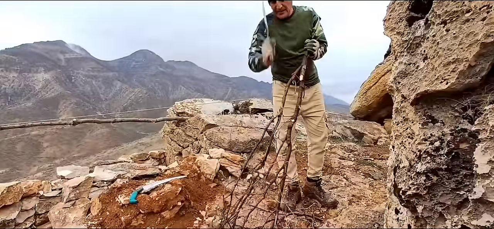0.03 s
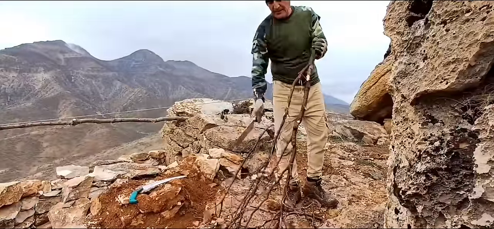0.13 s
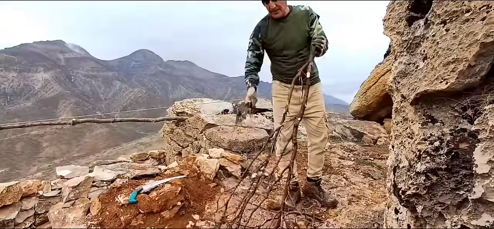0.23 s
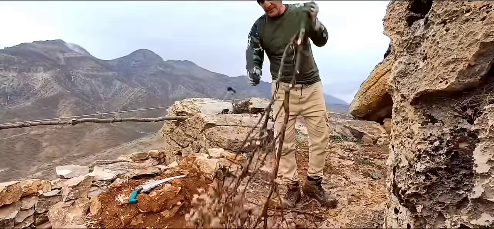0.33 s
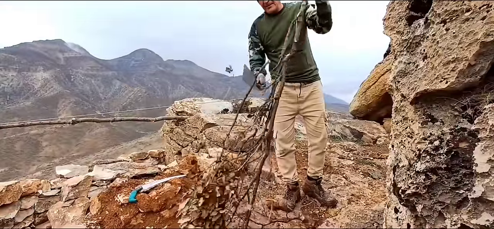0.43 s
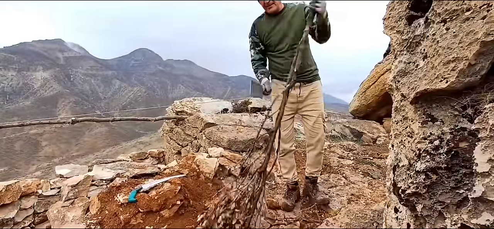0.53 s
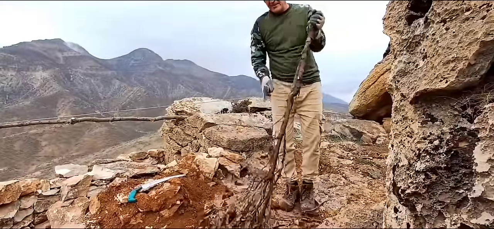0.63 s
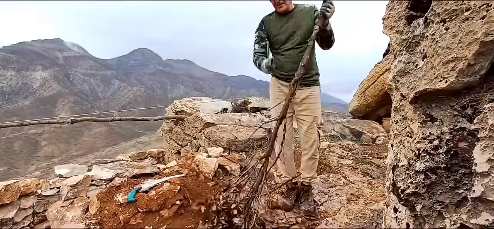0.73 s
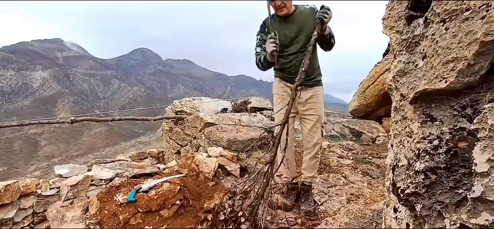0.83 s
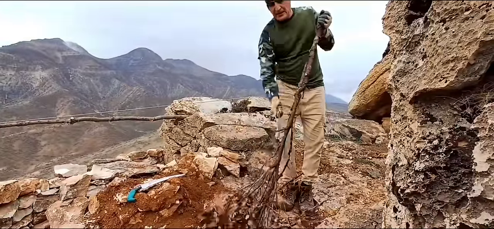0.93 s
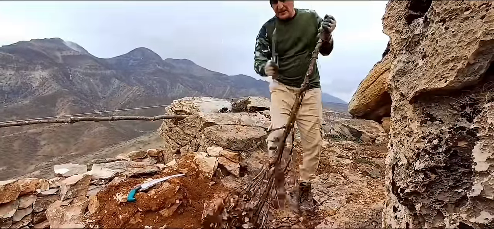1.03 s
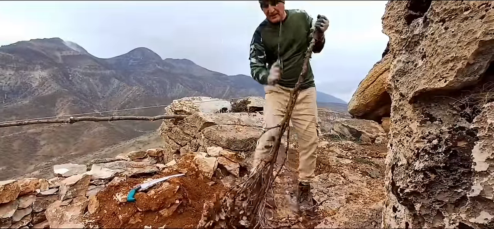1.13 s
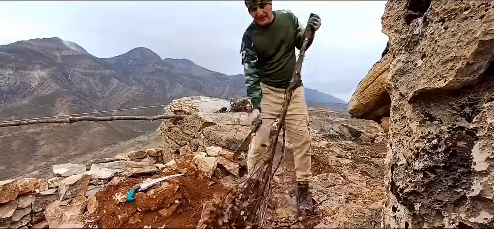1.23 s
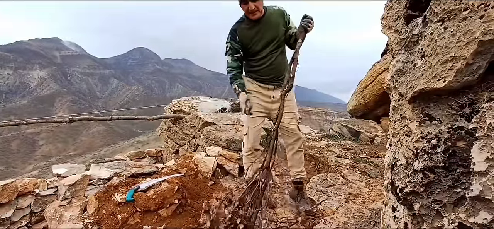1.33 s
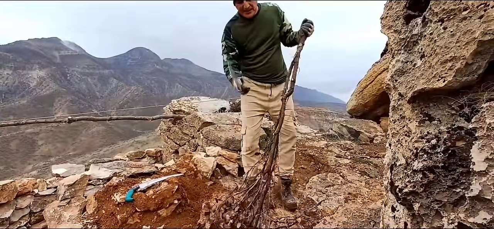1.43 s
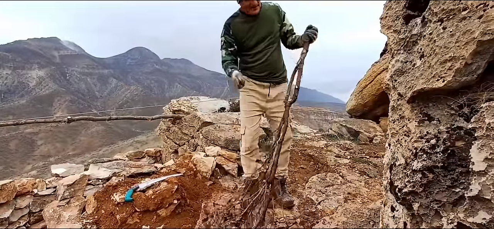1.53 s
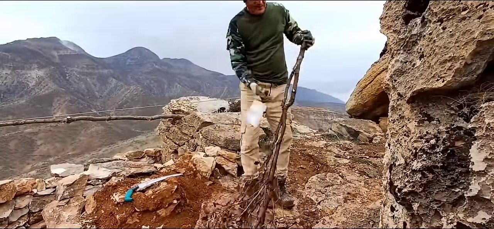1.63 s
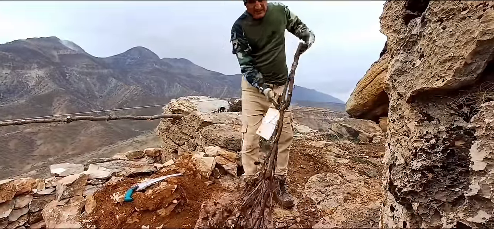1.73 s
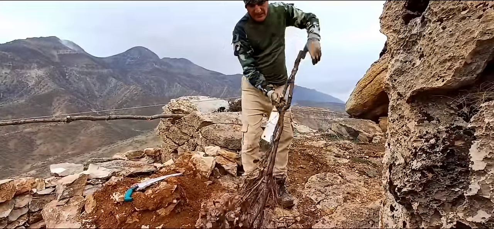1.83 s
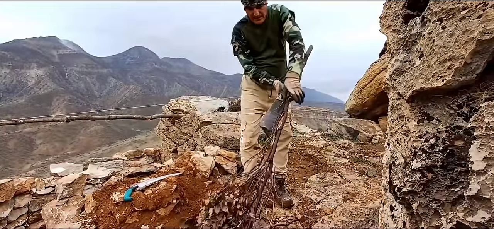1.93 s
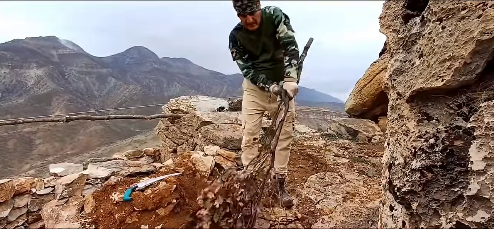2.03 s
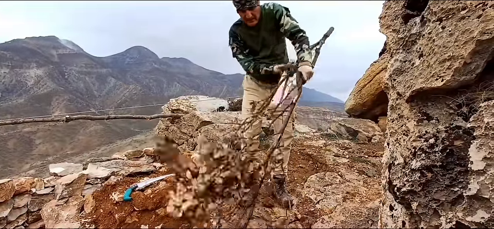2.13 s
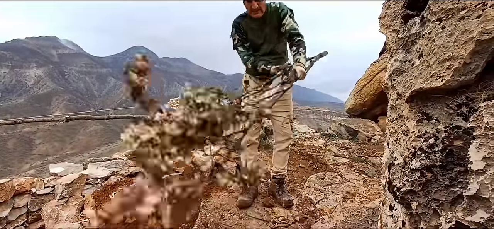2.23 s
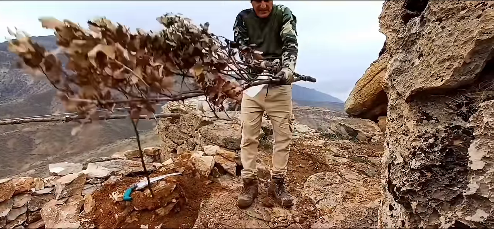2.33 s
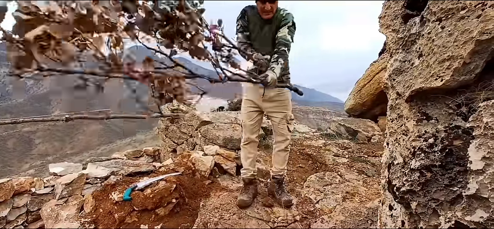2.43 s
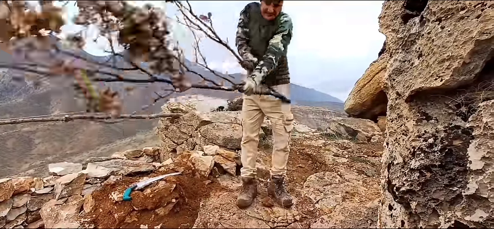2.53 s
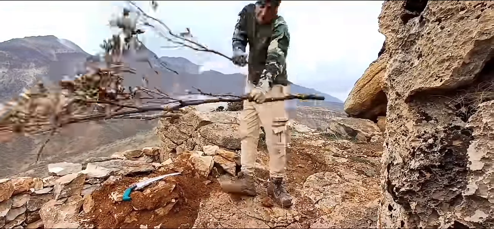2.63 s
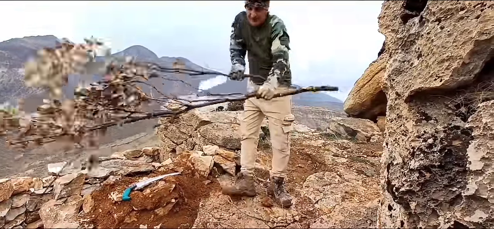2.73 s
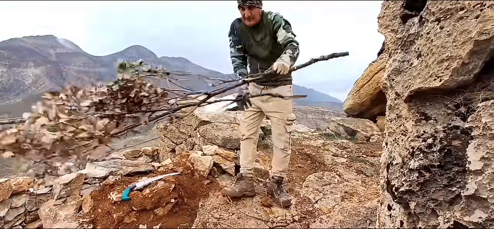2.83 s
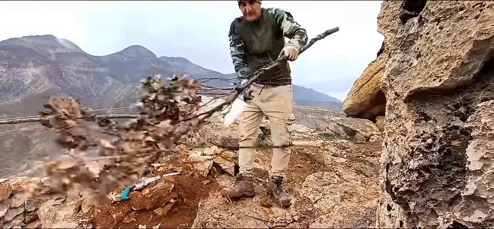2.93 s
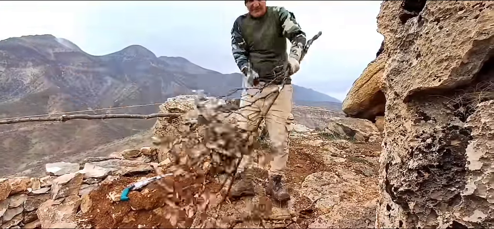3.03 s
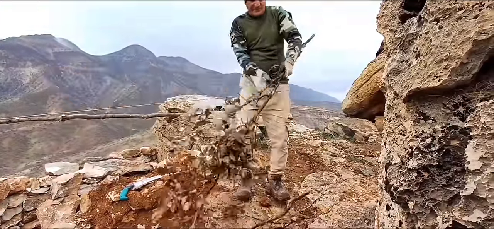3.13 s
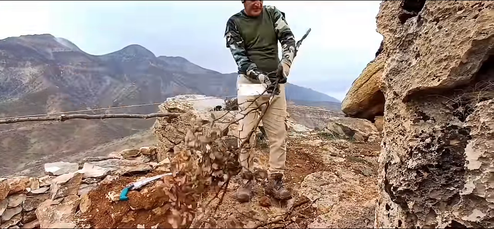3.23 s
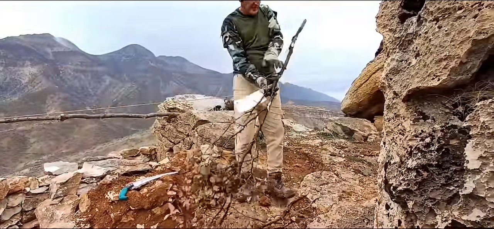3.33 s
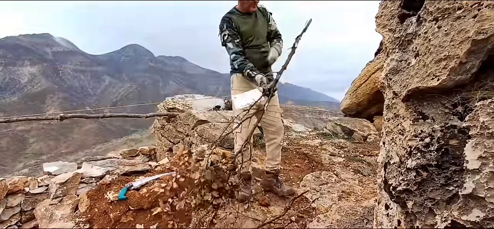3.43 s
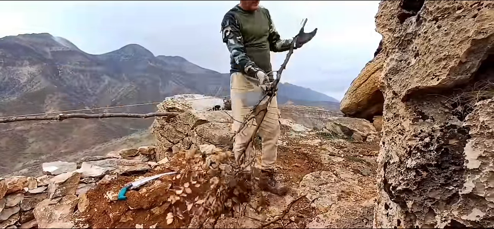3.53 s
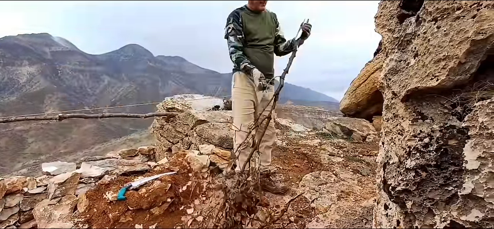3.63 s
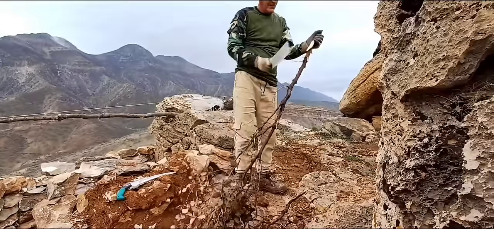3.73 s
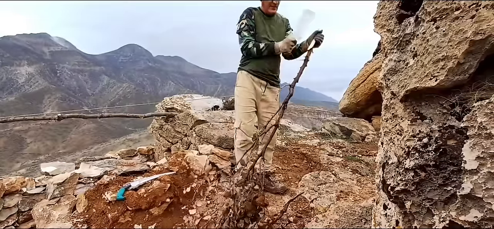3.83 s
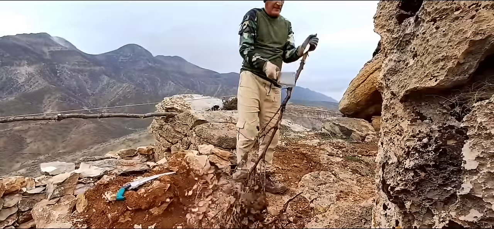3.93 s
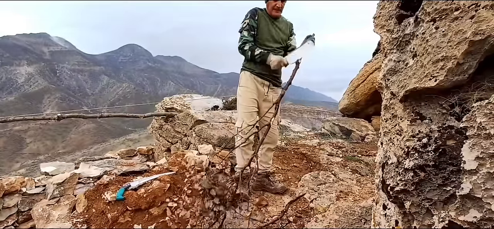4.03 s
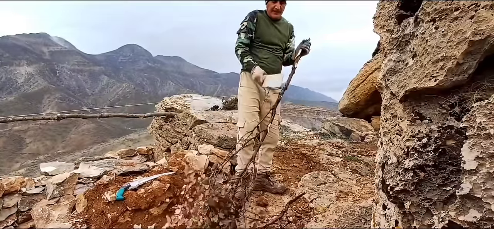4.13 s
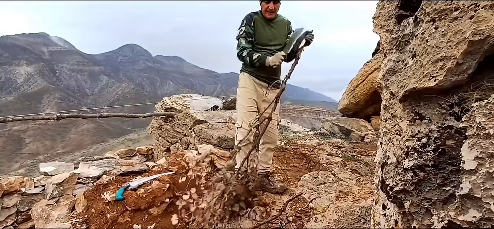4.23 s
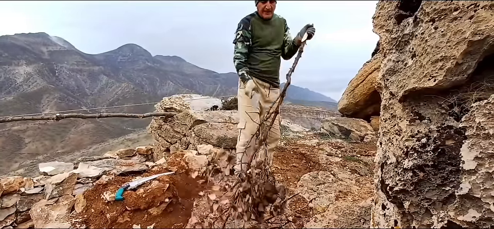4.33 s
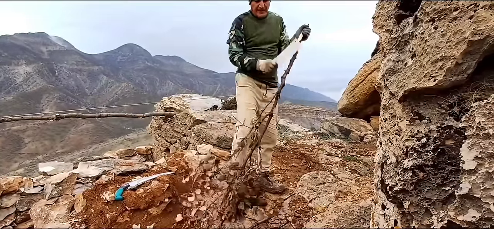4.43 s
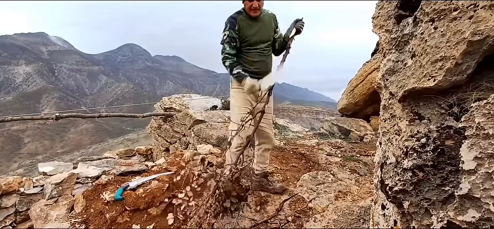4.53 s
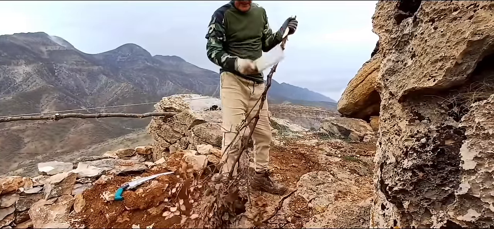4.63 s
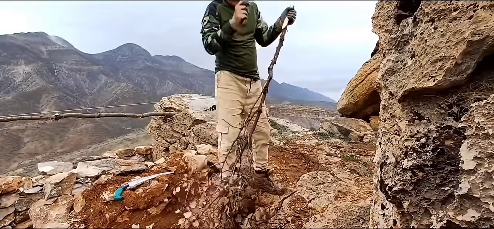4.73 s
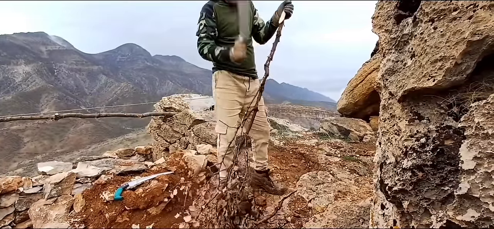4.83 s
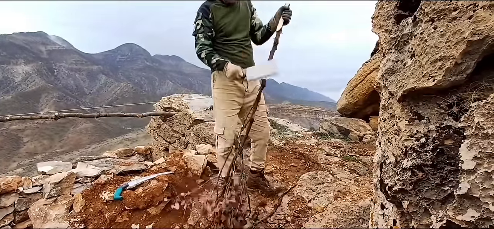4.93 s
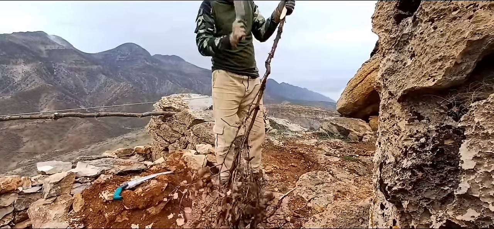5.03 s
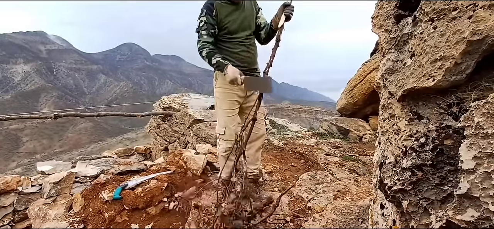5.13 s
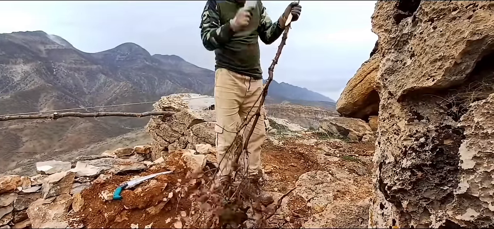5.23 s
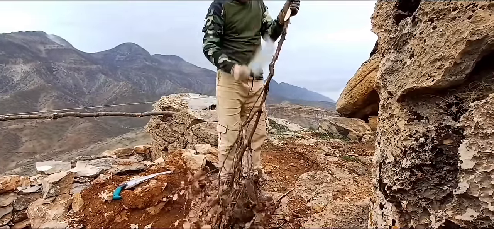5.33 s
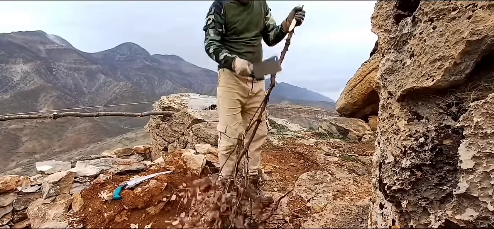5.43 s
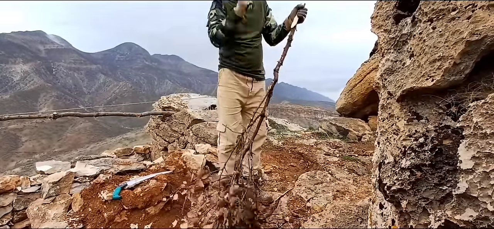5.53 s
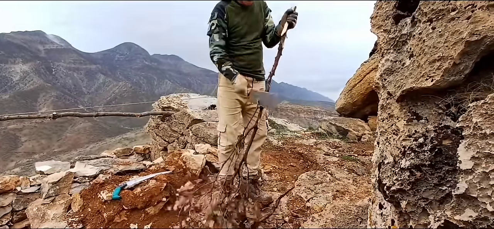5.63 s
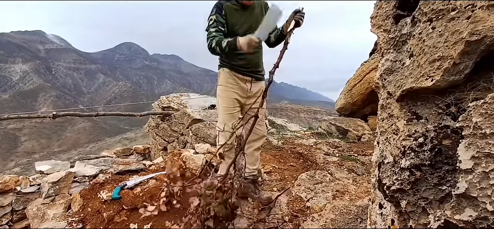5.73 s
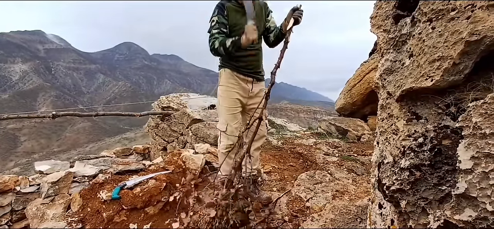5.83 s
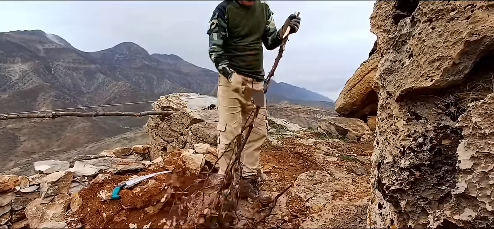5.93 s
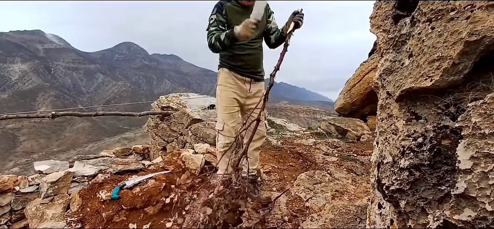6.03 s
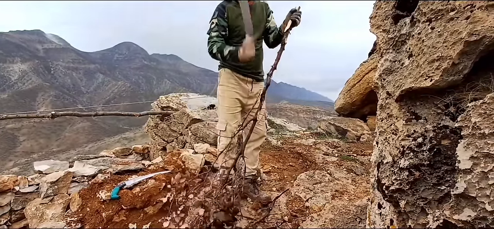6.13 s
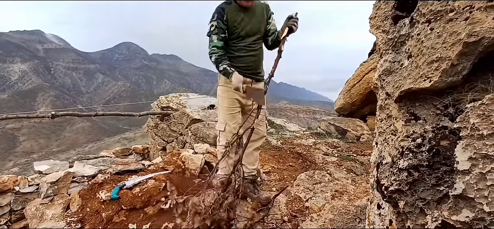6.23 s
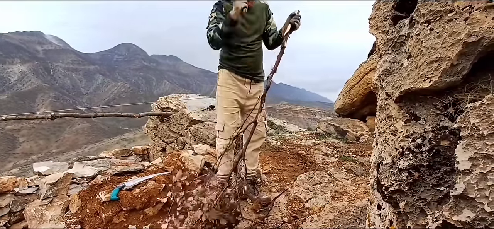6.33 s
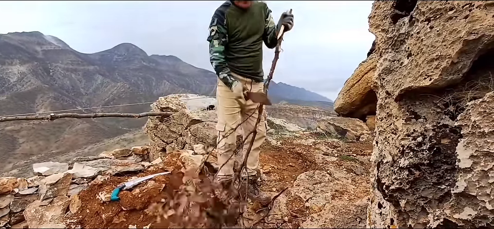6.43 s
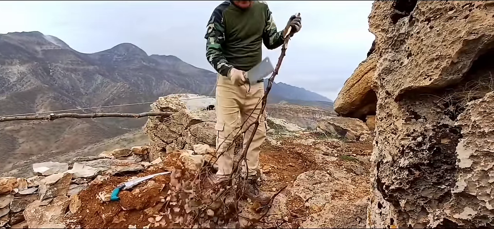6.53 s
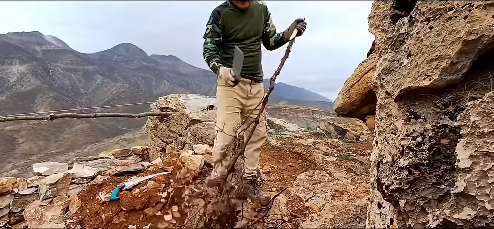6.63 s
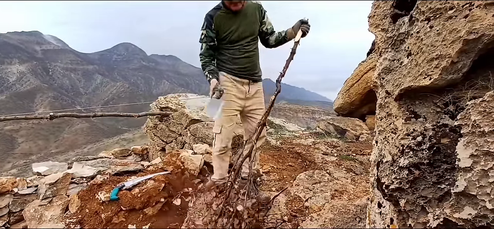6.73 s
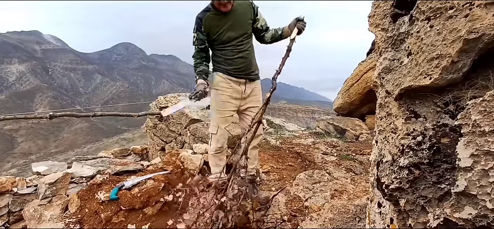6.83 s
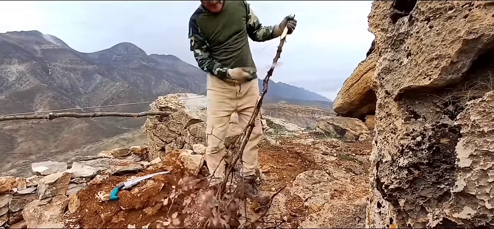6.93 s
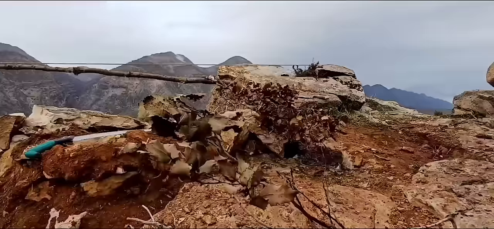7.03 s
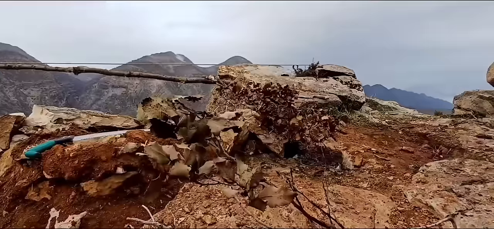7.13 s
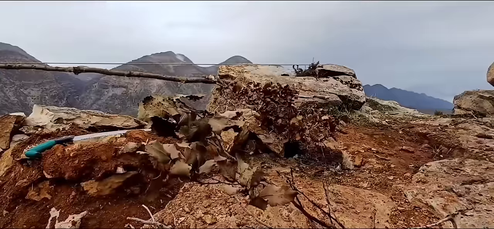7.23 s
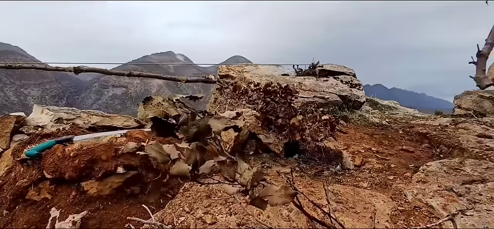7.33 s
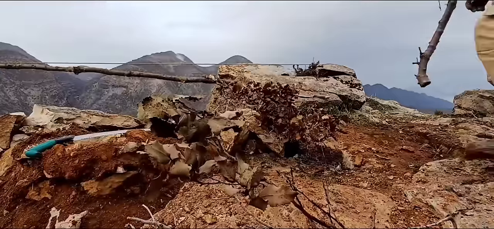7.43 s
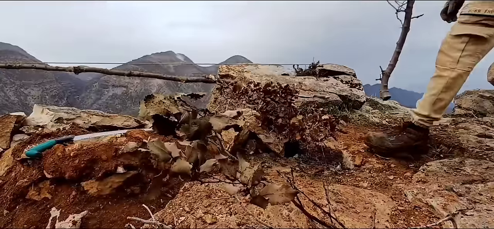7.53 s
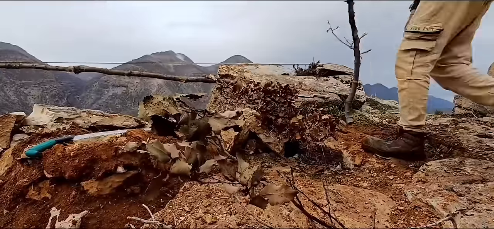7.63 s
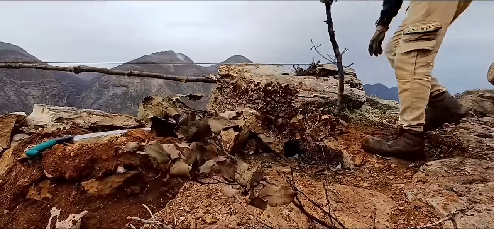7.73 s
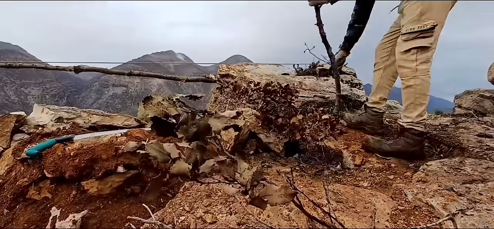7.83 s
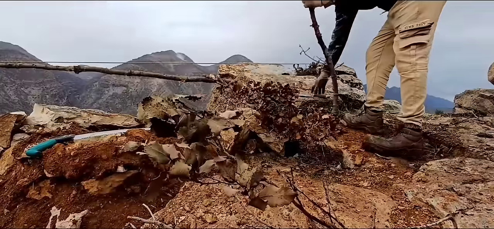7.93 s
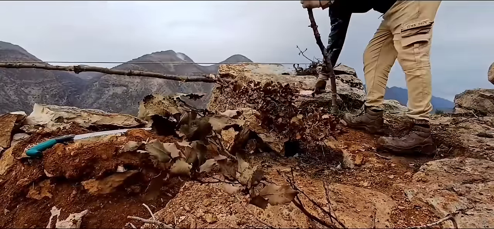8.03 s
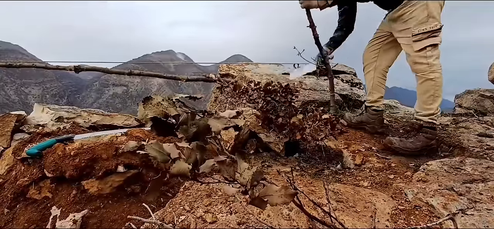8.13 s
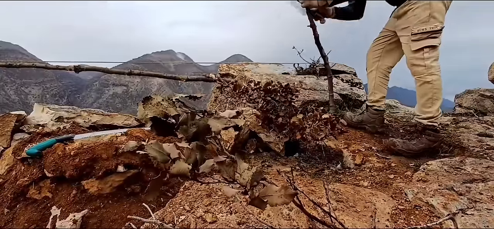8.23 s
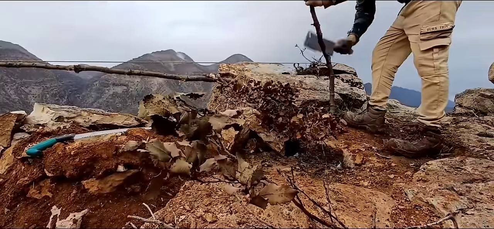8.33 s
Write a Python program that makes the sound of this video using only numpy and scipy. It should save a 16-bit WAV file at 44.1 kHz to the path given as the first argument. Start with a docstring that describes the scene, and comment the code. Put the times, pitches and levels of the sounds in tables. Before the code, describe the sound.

Close stereo outdoor sound, dry with only slight rock reflections: hard, crackling blade hits on brittle wood, dead leaves shivering after each. Between early hits the leafy crown swishes and twigs flick; later chops fall about four per second apart from small gaps. Sound cuts out momentarily, then it is quieter, with gritty boot scuffs, dull bumps and low wind puffs.

```python
"""Open hillside above a valley: a dry, leafy branch is trimmed with a cleaver a few steps from the microphone.
Chop = filtered crackle (knock, fibre tear, fizz) + blade and stem modes + chatter of dead leaves.
Between chops: enveloped crackle for swung leaves and twig flicks; later, boots scrape over grit.
Dull, unsteady sine thuds for footfalls, bumps and gust pops at the microphone.
Background: shaped noise for gusts and valley air, a faint gliding hum. All sound drops out briefly near 7 s."""
import sys
import numpy as np
from scipy import signal
from scipy.fft import rfft, irfft, next_fast_len
from scipy.io import wavfile
from scipy.ndimage import uniform_filter1d

SR = 44100
rng = np.random.default_rng(int(sys.argv[2]) if len(sys.argv) > 2 else 0)


def inscribe(sig):
    """Save sig as 16-bit PCM at rate SR to the path in sys.argv[1].

    A 1-D sig is mono; a 2-D sig holds one channel per row.
    Samples are clipped to [-1, 1] before scaling.
    """
    pcm = np.round(np.clip(np.atleast_2d(sig).T, -1, 1) * 32767)
    wavfile.write(sys.argv[1], SR, pcm.astype(np.int16))


N = 369116
TIME_S = np.arange(N) / SR

# Cleaver blows: t/s, time in wood/s, rel. knock/dB, rel. crack/dB, rel. fizz/dB, strongest ring f/Hz,
# leaf level/dB, leaf 20 dB fall time/s, extra leaf treble/dB
CHOPS = [(0.047, .005, -24.5, -20, -26, 820, -32, .11, 0),
         (0.8535, .01, -33.5, -19.5, -17.5, 2800, -37, .13, -4),
         (1.157, .005, -24.5, -17.5, -16.5, 400, -40, .11, -3),
         (3.828, .004, -38, -33, -35.5, 1850, -39.5, .09, -3),
         (3.872, .003, -35, -31, -32, 400, -45, .08, -3), (4.055, .006, -33, -24, -26, 820, -42, .15, -1),
         (4.257, .01, -46, -33, -33, 2800, -36, .07, 2), (4.4995, .012, -33, -23, -29, 1850, -36, .125, 2),
         (4.822, .006, -24, -25, -22.5, 1490, -33, .135, 3),
         (5.067, .0025, -24.5, -22.5, -25, 1110, -34, .125, 2),
         (5.316, .004, -22, -23, -17, 820, -32.5, .12, 1.5),
         (5.595, .004, -26.5, -22.5, -35, 1850, -34, .125, 1),
         (5.846, .01, -38, -29.5, -27, 2800, -34, .155, 3),
         (6.1225, .006, -30, -24.5, -27, 2150, -32.5, .13, 2.5),
         (6.391, .018, -34.5, -30.5, -30, 1110, -31.5, .125, 3),
         (6.8685, .007, -36, -30, -38, 3970, -39, .11, 1), (8.301, .003, -40, -46, -48, 1110, -44, .2, -5)]
# Strained wood giving way: peak t/s, 60 dB rise time/s, t60/s, rel. knock/dB, rel. crack/dB, rel. fizz/dB,
# strongest ring f/Hz
SPLITS = [(1.176, .06, .075, -41, -27, -25, 12800), (2.5312, .075, .085, -42, -26, -30, 4000),
          (4.04, .025, .035, -42, -29.5, -27.5, 5100), (4.27, .03, .06, -41, -25, -21, 7600),
          (4.3402, .0033, .029, -44, -32, -22.5, 15200), (4.5242, .0105, .0275, -34, -8, -16.5, 7600),
          (8.3318, .018, .055, -39, -26.5, -24, 12400)]
# Modes of the blade in the wood: f/Hz, t60/s, rel. level/dB
BLADE_MODES = [(390, .03, -16), (505, .025, -20), (818, .035, -13), (1110, .035, -12), (1488, .04, -14),
               (1846, .055, -8.5), (2150, .03, -16.5), (2800, .04, -10), (3970, .04, -15),
               (5020, .03, -18.5), (6390, .03, -18), (7550, .028, -19), (12800, .012, -24),
               (14400, .012, -24), (15330, .018, -18)]
# Single twig flicks: t/s, rel. level/dB, treble re body/dB
TWIGS = [(0.5273, -18, 12), (0.578, -20.5, 6), (1.0627, -40, 6), (1.2646, -36, 1), (1.4717, -42, 0),
         (1.5768, -36, 8), (1.6867, -41, -2), (1.7719, -32, 4), (1.8394, -36, -3), (1.9725, -34, -1),
         (2.1203, -28, 0), (2.156, -27, 8), (2.2563, -36, -8), (2.364, -29, 5), (2.4888, -28, 4),
         (2.7167, -24.5, 5), (2.829, -26, -15), (2.9872, -26, -2), (3.0615, -23.5, -1), (3.1203, -32, 8)]
# Blade brushing a twig, ringing freely: t/s, f/Hz, level/dB, t60/s
PINGS = [(2.830, 1854, -33, .088), (2.830, 3892, -44, .053)]
# Sweeps of the leafy crown: peak t/s, rel. level/dB, 20 dB swell time/s, 20 dB fade time/s
SWISHES = [(0.32, -49, .06, .17), (0.59, -44, .2, .18), (1.09, -59, .05, .07), (1.26, -56, .06, .09),
           (1.54, -59, .15, .08), (1.79, -54, .03, .14), (2.115, -46, .2, .17), (2.385, -45.5, .08, .16),
           (2.535, -41, .05, .18), (3.0, -42, .085, .17), (3.18, -54.5, .1, .28), (3.66, -63, .2, .1),
           (4.41, -60, .14, .1), (6.58, -60, .1, .18), (4.04, -44, .03, .03), (5.589, -38, .02, .025)]
# Low thuds: footfalls, bumps and gust pops at the microphone:
# t/s, mean f/Hz, level/dB, t60/s, lean/dB (added left, taken off right)
THUDS = [(2.385, 137, -47.5, 0.33, 0.5), (2.454, 122, -44, 0.33, 0), (3.328, 88, -28, 0.13, 9),
         (3.424, 95, -41.5, 0.11, 10), (7.162, 589, -39.5, 0.074, -2), (7.186, 675, -41, 0.057, -1),
         (7.199, 129, -34.5, 0.039, -1), (7.323, 68.6, -44, .07, 5), (7.632, 500, -54.5, .05, 0.5),
         (7.851, 70, -39.5, .12, 6)]
# Boots on dry dirt: peak t/s, rel. level/dB, 60 dB swell time/s, t60/s
SCUFFS = [(7.203, -43, 0.17, 0.085), (7.28, -71, .2, .4), (7.49, -71.5, .25, .5), (7.595, -57.5, .16, .11),
          (7.79, -75, .2, .4), (8.048, -59, .16, .079)]
# Gusts at the microphone: t/s, level/dB, half length/s, lean/dB (added left, taken off right)
BUFFETS = [(0.6, -57, .12, -4), (0.85, -57, .15, 3), (2.5, -53, .1, 1), (2.75, -56, .04, 5),
           (3.38, -50, .1, 10), (4.13, -45, .08, 0), (4.2, -46.5, .05, 6), (4.87, -54, .14, 4),
           (5.09, -49, .06, 6), (5.59, -52, .08, 5), (6.13, -53, .05, 0), (6.43, -53, .05, 0),
           (7.34, -55, .08, 8), (7.52, -56, .07, 8), (7.87, -52, .08, 10), (8.34, -53, .05, 0)]
# Distant valley air: t/s, rel. level/dB
AIR = [(0, -56.5), (3.3, -56.5), (4.3, -54), (5.5, -60), (6.9, -56.5), (7.08, -72), (7.25, -67),
       (8.37, -67)]
# Faint far hum: t/s, f/Hz, level/dB
HUM = [(3.63, 410, -77), (3.68, 401, -54), (3.73, 408, -63), (3.78, 412, -54), (3.83, 400, -73)]

# Spectra of wood, dead leaves, leafy crown, valley air, gusts: f/Hz, rel. density/dB
WOOD = [(60, -26.5), (160, -8), (300, -7), (430, -4), (650, -7), (1050, 0), (1600, -3), (2800, 0),
        (4600, -4), (7500, -5), (8800, -12), (11000, -8), (15500, -2)]
LEAVES = [(59, -31), (100, 0), (358, -5), (705, -5.5), (768, -5.5), (1080, -3), (1230, -6.5), (1610, -7),
          (2170, 0.5), (2420, -2.5), (3540, -5), (7450, -7), (9410, -11.5), (15000, 0.5), (16000, -5.5)]
CROWN = [(120, -35), (200, -4.5), (387, -5), (456, -2), (590, -6), (899, -1), (1350, -4), (1480, -7.5),
         (2250, 0), (5230, -6), (7410, -5.5), (8900, -12.5), (15100, -1), (16000, -4)]
VALLEY = [(30, -14), (100, -3), (250, -4), (420, -2), (600, -4.5), (820, 1.5), (1050, -2), (1300, 0.5),
          (1600, -7), (2200, -20), (5000, -30.5), (10000, -32), (15500, -27.5)]
GUSTS = [(20, -12), (50, -2), (80, 0), (125, -4), (190, -15.5), (350, -32.5), (1000, -59.5)]
# Spectrum of grit under boots: f/Hz, rel. density/dB
GRIT = [(100, -7), (600, 0.5), (1500, -6), (4000, -10), (7500, -10), (9500, -15), (15000, -10)]
# Left-right likeness of near cracks and of spread sounds: f/Hz, coherence/0-1
NEAR_SAME = [(100, 1), (600, .9), (1300, .5), (4000, 0.4), (8000, .1), (16000, .05)]
WIDE_SAME = [(100, 1), (500, .8), (1200, .35), (2200, 0.07), (16000, .02)]
# Left-right likeness of valley air and of gusts: f/Hz, coherence/0-1
AIR_SAME = [(100, .85), (800, .7), (1500, .4), (4000, .1)]
GUST_SAME = [(40, .15), (150, .6)]
# Port tilt: f/Hz, gain/dB (added left, taken off right)
PORT_LEAN = [(150, 0), (600, -1.66), (1500, -2.1), (3000, -0.54), (8000, 0), (13000, 2.5)]

CHOP_RISE_S, CHOP_T60_S = .0045, .031  # edge enters at once; stem stops soon after
SETTLE_DB, SETTLE_DB_PER_S = -14.5, 85  # last leaves come to rest slowly after a blow
FLICK_DB, FLICK_DB_PER_S = -18, 220  # a twig shakes its own few leaves
SWISH_SHAPE = 1.5  # power of time: 1 pointed, 2 round
CARRIED_S = (0.2, 3.38)  # branch on the move, never quite still
DROPOUT_S = (7.0, 7.063)
EDGE_HZ = 16000


def amp(db):
    """Decibels to gain."""
    return np.exp(np.asarray(db) * (np.log(10) / 20))


def unit(x):
    """Scales to rms 1."""
    return x / np.sqrt(np.mean(x ** 2) + 1e-20)


def read(points, hz):
    """Interpolates a frequency table on a log-frequency axis."""
    f, value = np.transpose(points)
    return np.interp(np.log(hz + 1), np.log(f + 1), value)


def curve(rows, axis=1):
    """One column of a time table at every sample."""
    rows = np.asarray(rows)
    return np.interp(TIME_S, rows[:, 0], rows[:, axis])


def add(mix, at_s, sound):
    """Adds a sound to the mix, cropped to fit."""
    start = round(at_s * SR)
    sound = sound[:, max(-start, 0):]
    part = mix[:, max(start, 0):][:, :sound.shape[1]]
    part += sound[:, :part.shape[1]]


def colour(x, spectrum, lo_hz=15, hi_hz=21000):
    """Minimum-phase filter: given spectrum between two steep band edges."""
    size = 4096 if x.shape[1] > SR else 1024
    hz = abs(np.fft.fftfreq(size, 1 / SR)) + 1
    edges = np.sqrt((1 + (lo_hz / hz) ** 12) * (1 + (hz / hi_hz) ** 12))
    gain = amp(read(spectrum, hz)) / edges
    response = np.exp(np.conj(signal.hilbert(np.log(gain + 1e-5))))
    taps = np.fft.ifft(response).real[:size // 2]
    return signal.oaconvolve(np.float32(x), np.float32(taps[None]), axes=1)[:, :x.shape[1]]


def pair(x, likeness):
    """Mixes two unrelated signals to a stereo pair of given coherence."""
    size = next_fast_len(x.shape[1])
    a, b = rfft(np.float32(x), size)
    turn = np.arccos(np.clip(read(likeness, np.fft.rfftfreq(size, 1 / SR)), 0, 1)) / 2
    mid, side = a * np.cos(turn), b * np.sin(turn)
    return irfft([mid + side, mid - side], size)[:, :x.shape[1]]


def wander(n, rate_hz):
    """Random knots joined by straight lines, about unit spread."""
    at = np.arange(n) * rate_hz / SR
    knots = rng.standard_normal(n // 128 + 2)
    return np.interp(at, np.arange(len(knots)), knots) * np.sqrt(3 / 2)


def scatter(x, t60_s, likeness):
    """Close reflections: short decaying noise blurs and colours the cracks, differently at each port."""
    t = np.arange(512) / SR
    taps = pair(rng.standard_normal((2, len(t))), likeness) * amp(-60 * t / t60_s)
    taps = unit(taps) / np.sqrt(len(t))
    return signal.oaconvolve(np.float32(x[None]), np.float32(taps), axes=1)[:, :len(x)]


def crackle(n, per_s, spread_db, clump_db, likeness, count=2, t60_s=.008):
    """Clumped tiny fractures of uneven size from several spots, each with its own colour."""
    out = 0
    for _ in range(count):
        at = np.flatnonzero(rng.random(n) < per_s / count / SR)
        size, sign = rng.random((2, n))[:, at]
        knots = rng.standard_normal(n // 360 + 2)  # one per 8 ms
        clumps = np.interp(at / 360, np.arange(len(knots)), knots)
        size_db = spread_db * np.minimum(-np.log(size + 1e-9), 4) + clump_db * clumps
        clicks = np.zeros(n)
        clicks[at] = amp(size_db) * np.sign(sign - .5)
        out = out + scatter(clicks, t60_s, likeness)
    return out


def burst(rise_s, t60_s, hold_s=0):
    """Times round an onset, and an envelope that swells to it, holds and dies away."""
    t = np.arange(-SR // 9, SR // 7) / SR
    steps = np.where(t < 0, -t / rise_s, (t - hold_s) / t60_s)
    return t, amp(np.minimum(-60 * steps, 0))


def blade_ring(tear, ring_hz, focus_octaves):
    """Tearing drives decaying blade and stem modes; where the edge lands decides which ring most."""
    age = np.arange(SR // 20) / SR
    mode_hz, mode_t60_s, mode_db = np.transpose(BLADE_MODES)[:, :, None]
    dying = amp(-60 * age / mode_t60_s) / np.sqrt(mode_t60_s)
    focus = np.exp(-(np.log2(mode_hz / ring_hz) / focus_octaves) ** 2)
    weight = amp(mode_db + rng.normal(0, 3, mode_db.shape)) + focus
    tuned_hz = mode_hz * rng.normal(1, .004, mode_hz.shape)
    modes = (weight * dying * np.cos(2 * np.pi * tuned_hz * age)).sum(0)
    return unit(signal.fftconvolve(tear, modes[None], axes=1)[:, :tear.shape[1]])


def cut(rise_s, hold_s, t60_s, knock_db, crack_db, fizz_db, ring_hz,
        bite=5.5, focus_octaves=.25, ring_db=-10, body_db=-1.4):
    """Fibres tear in a quick run of cracks, in three bands, and excite blade and stem."""
    t, envelope = burst(rise_s, t60_s, hold_s)
    tear = unit(crackle(len(t), 14000, 1.7, 1.1, NEAR_SAME, count=1, t60_s=.008)) * envelope
    # one hard click at the peak, strongest in a short, square hit
    tear[:, np.argmax(envelope)] += bite * np.exp(-(rise_s + hold_s) / .012)
    bands = (knock_db, 90, 1500), (crack_db, 1500, 8000), (fizz_db, 8000, 17000)
    sound = sum(amp(db + body_db) * unit(colour(tear, WOOD, lo_hz, hi_hz)) for db, lo_hz, hi_hz in bands)
    ring_gain = amp(ring_db) * (amp(knock_db) + amp(crack_db))
    sound = sound + ring_gain * blade_ring(tear, ring_hz, focus_octaves)
    return t[0], sound * np.sqrt(np.mean(envelope ** 2))


def chops():
    """Cleaver strikes the stem: abrupt cuts; strained wood splits: cuts with their own swell."""
    out = np.zeros((2, N))
    for at_s, hold_s, knock_db, crack_db, fizz_db, ring_hz, *_ in CHOPS:
        lead_s, sound = cut(CHOP_RISE_S, hold_s, CHOP_T60_S, knock_db, crack_db, fizz_db, ring_hz)
        add(out, at_s + lead_s, sound)
    for at_s, rise_s, t60_s, knock_db, crack_db, fizz_db, ring_hz in SPLITS:
        lead_s, sound = cut(rise_s, 0, t60_s, knock_db, crack_db, fizz_db, ring_hz, ring_db=-5)
        add(out, at_s + lead_s, sound)
    return out


def twigs(t60_s=.06, gain_db=-7.5):
    """Thin twigs flick and snap in short crackle bursts; once the blade catches one and pings."""
    out = np.zeros((2, N))
    for at_s, level_db, treble_db in TWIGS:
        t, envelope = burst(.0077, t60_s)
        snap = crackle(len(t), 3000, 3.8, 2, NEAR_SAME, count=1, t60_s=.0083) * envelope
        body = unit(colour(snap, WOOD, 900, 8000))
        top = unit(colour(snap, WOOD, 8000, 17000))
        sound = unit(body + amp(treble_db) * top) * np.sqrt(np.mean(envelope ** 2))
        add(out, at_s + .0025 + t[0], amp(level_db + gain_db) * sound)
    age = np.arange(SR // 5) / SR
    for at_s, hz, level_db, ping_t60_s in PINGS:
        cycles = hz * age + rng.uniform(0, .21, (2, 1))  # own phase at each port
        add(out, at_s, amp(level_db - 60 * age / ping_t60_s) * np.sin(2 * np.pi * cycles))
    return out


def shaken_leaves(rise_s=.008, fall_shape=1.9, jolt_db=-16.5, jolt_t60_s=.16):
    """Each chop jolts the branch with a low bump; dead leaves chatter against each other."""
    out, age = np.zeros((2, N)), np.arange(SR // 4) / SR
    for at_s, _, knock_db, *_, leaf_db, fall_s, treble_db in CHOPS:
        chatter = crackle(len(age), 16000, 1.6, 1.3, WIDE_SAME, count=4, t60_s=.003)
        body = unit(colour(chatter, LEAVES, hi_hz=8000))
        top = unit(colour(chatter, LEAVES, lo_hz=8000))
        leaves = amp(leaf_db - 20 * (age / fall_s) ** fall_shape) * (body + amp(treble_db) * top)
        bump = unit(colour(chatter, LEAVES, lo_hz=65, hi_hz=430))
        jolt = amp(knock_db + jolt_db - 60 * age / jolt_t60_s) * bump
        add(out, at_s, np.minimum(age / rise_s, 1) * (leaves + jolt))
    return out


def rustle(crown_db=1.5, resting_db=-64, held_db=-78):
    """Leaves and twigs brush past each other in swings, then settle after chops and flicks; ends at dropout."""
    power, t = np.zeros((1, N)), np.arange(-SR // 2, SR // 2) / SR
    for at_s, level_db, swell_s, fade_s in SWISHES:
        drop_db = 20 * abs(t / np.where(t < 0, swell_s, fade_s)) ** SWISH_SHAPE
        add(power, at_s + t[0], amp(level_db + crown_db - drop_db)[None] ** 2)
    age = t[t >= 0][None]
    for at_s, *_, leaf_db, _, _ in CHOPS:
        add(power, at_s, amp(leaf_db + SETTLE_DB - SETTLE_DB_PER_S * age) ** 2)
    for at_s, level_db, _ in TWIGS:
        add(power, at_s, amp(level_db + FLICK_DB - FLICK_DB_PER_S * age) ** 2)
    power += amp(resting_db) ** 2 * (TIME_S > CARRIED_S[0]) * (TIME_S < CARRIED_S[1])
    power = (power + amp(held_db) ** 2) * (TIME_S < DROPOUT_S[0])
    grains = crackle(N, 4000, 2.0, 2.7, WIDE_SAME, count=5, t60_s=.0022)
    body = unit(colour(grains, CROWN, 180, 8000))
    top = unit(colour(grains, CROWN, 8000, 17000))
    return np.sqrt(power) * (body + top)


def boot_scuffs(scuff_db=3):
    """Soles scrape over grit: coloured crackle that swells and dies."""
    out = np.zeros((2, N))
    for at_s, level_db, swell_s, t60_s in SCUFFS:
        t, envelope = burst(swell_s, t60_s)
        grit = colour(crackle(len(t), 2500, 2.8, 3, NEAR_SAME, t60_s=.0032), GRIT)
        add(out, at_s + t[0], amp(level_db + scuff_db) * envelope * unit(grit))
    return out


def low_thuds(soft_s=.008):
    """Footfalls, bumps and gust pops at the microphone: dull, decaying sines of unsteady pitch."""
    out, age = np.zeros((2, N)), np.arange(SR // 4) / SR
    for at_s, hz, level_db, t60_s, lean_db in THUDS:
        cycles = np.cumsum(hz * (1 + .177 * wander(len(age), 300))) / SR
        decay = amp(level_db - 60 * np.maximum(age - soft_s, 0) / t60_s)
        thud = decay * np.minimum(age / soft_s, 1) * np.sin(2 * np.pi * cycles)
        add(out, at_s, thud * amp([[lean_db], [-lean_db]]))
    return out


def rocks(x, t60_s=.2, per_s=1500):
    """Sparse, short reflections from ground and rock face: random decaying taps."""
    t = np.arange(SR // 4) / SR
    hits = rng.standard_normal((2, len(t))) * (rng.random((2, len(t))) < per_s / SR)
    taps = pair(hits * (t > .004) * amp(-60 * t / t60_s), WIDE_SAME)
    return signal.oaconvolve(x, taps / np.linalg.norm(taps[0]), axes=1)[:, :N]


def breeze(breeze_db=-67, restless_db=3):
    """Light breeze: low noise whose gusts buffet mostly the left port."""
    gusts = unit(colour(pair(rng.standard_normal((2, N)), GUST_SAME), GUSTS))
    force = amp(breeze_db + restless_db * wander(N, 8))
    for at_s, level_db, half_s, lean_db in BUFFETS:
        peak = amp([[level_db + lean_db], [level_db - lean_db]])
        force = np.maximum(force, peak / (1 + ((TIME_S - at_s) / half_s) ** 2) ** 2)
    return force * gusts


def valley(air_db=-2):
    """Far valley wash: shaped noise of slightly wavering level."""
    air = unit(colour(pair(rng.standard_normal((2, N)), AIR_SAME), VALLEY))
    return air * amp(curve(AIR) + air_db + .8 * wander(N, 9))


def hum():
    """Faint far hum: a brief sine of gliding pitch."""
    cycles = np.cumsum(curve(HUM)) / SR
    heard = (TIME_S > HUM[0][0]) * (TIME_S < HUM[-1][0])
    return amp(curve(HUM, axis=2)) * np.sin(2 * np.pi * cycles) * heard


def scene():
    """Wood with its reflections, leaves, boots, thuds and open air."""
    wood = chops() + twigs()
    branch = wood + shaken_leaves() + rustle()
    near = branch + boot_scuffs() + low_thuds()
    return near + amp(-17.5) * rocks(wood) + breeze() + valley() + hum()


def record(dry):
    """Left port brighter, right fuller; brief dropout; clipping; band limit."""
    size = next_fast_len(N)
    lean_db = read(PORT_LEAN, np.fft.rfftfreq(size, 1 / SR))
    ports = irfft(rfft(dry, size) * amp([lean_db, -lean_db]), size)[:, :N]
    live = 1. * ((TIME_S < DROPOUT_S[0]) | (TIME_S > DROPOUT_S[1]))
    live = uniform_filter1d(live, size=100)  # softens the dropout edges
    low_pass = signal.firwin(301, EDGE_HZ, window=("kaiser", 7), fs=SR)
    return signal.oaconvolve(np.clip(ports * live, -1, 1), low_pass[None], "same")


dry = scene()
out = record(dry)
inscribe(out)
```